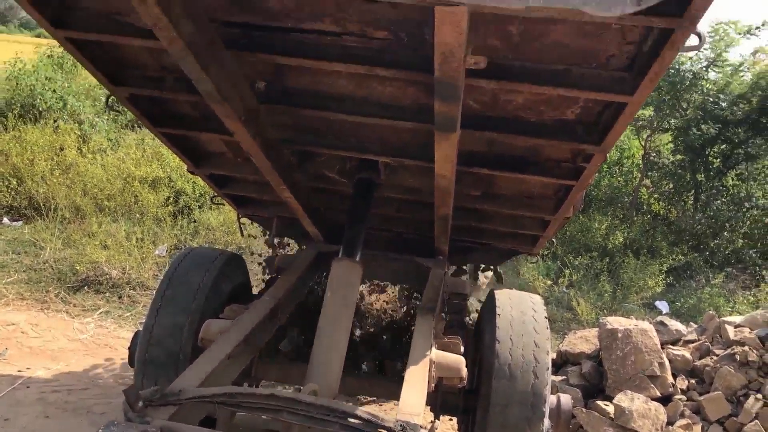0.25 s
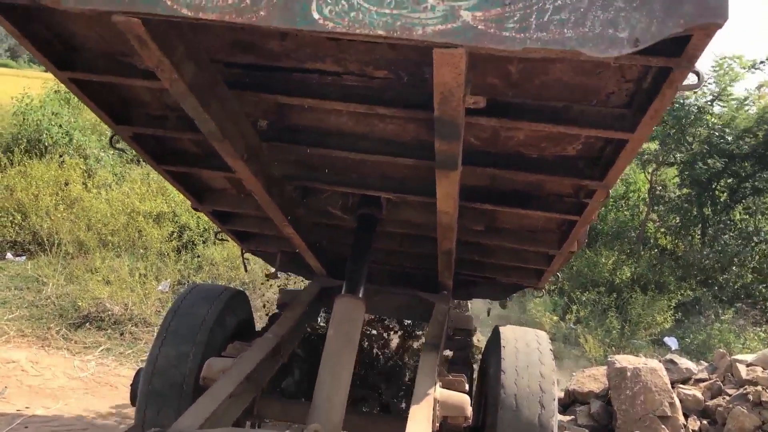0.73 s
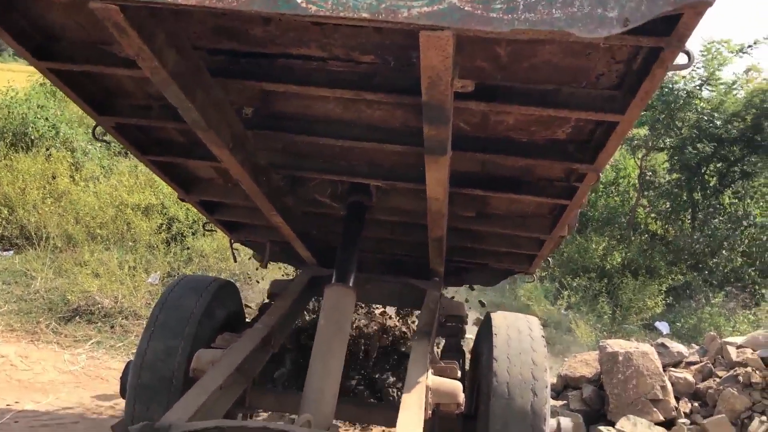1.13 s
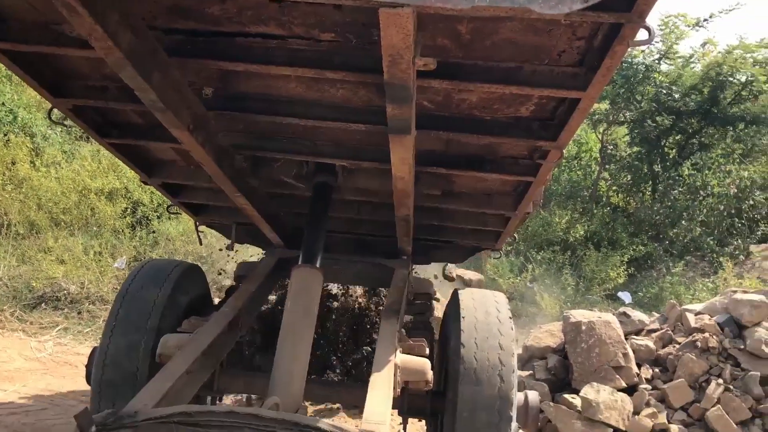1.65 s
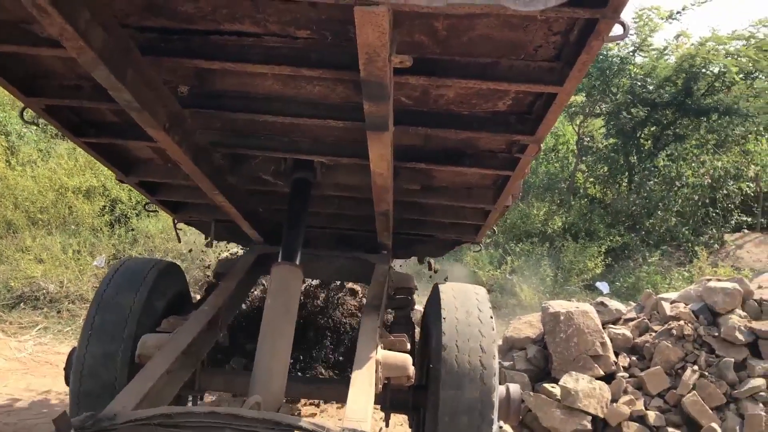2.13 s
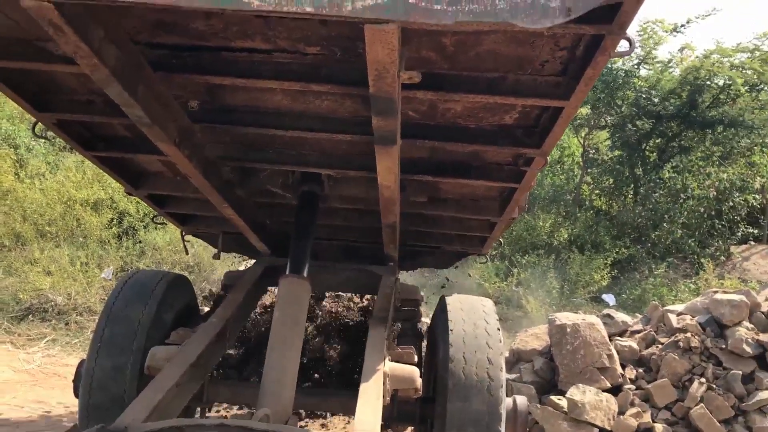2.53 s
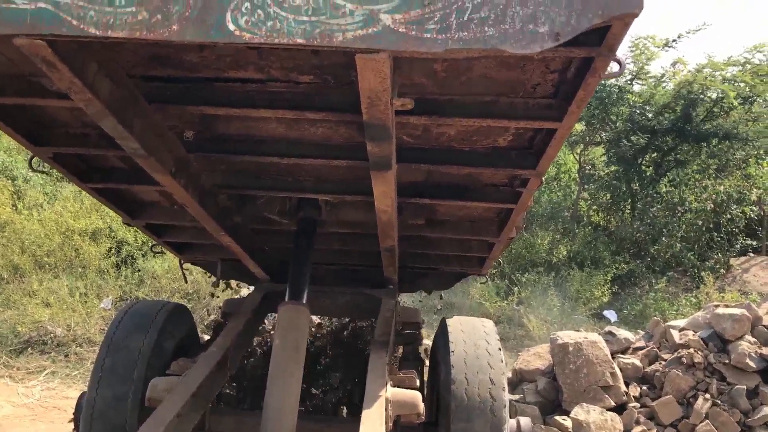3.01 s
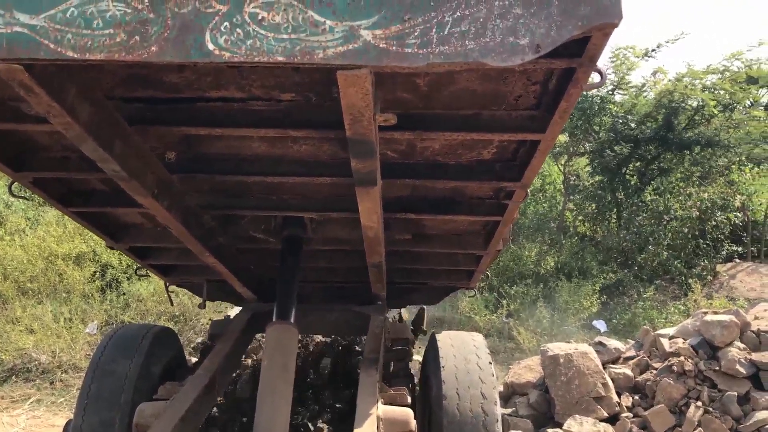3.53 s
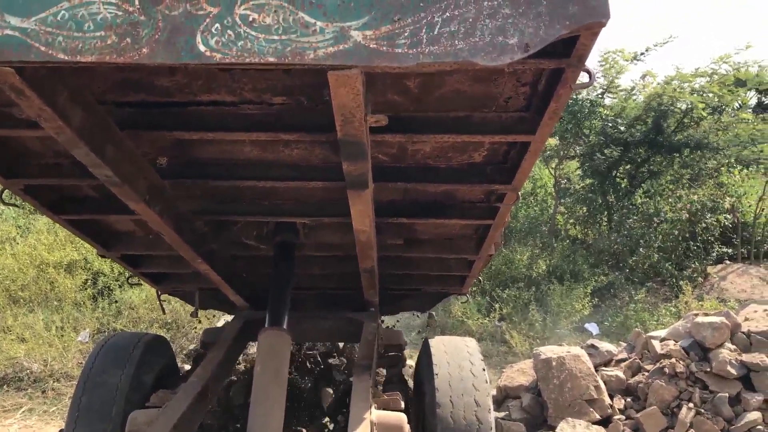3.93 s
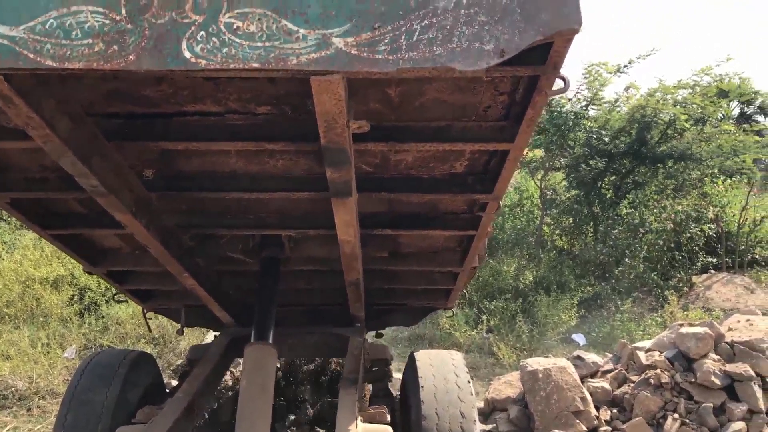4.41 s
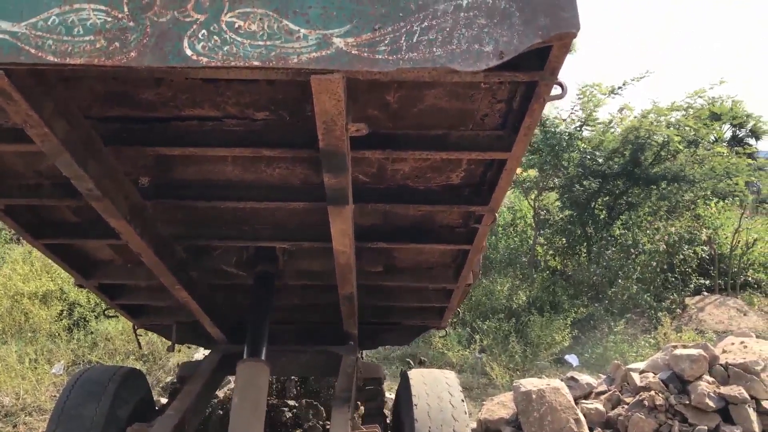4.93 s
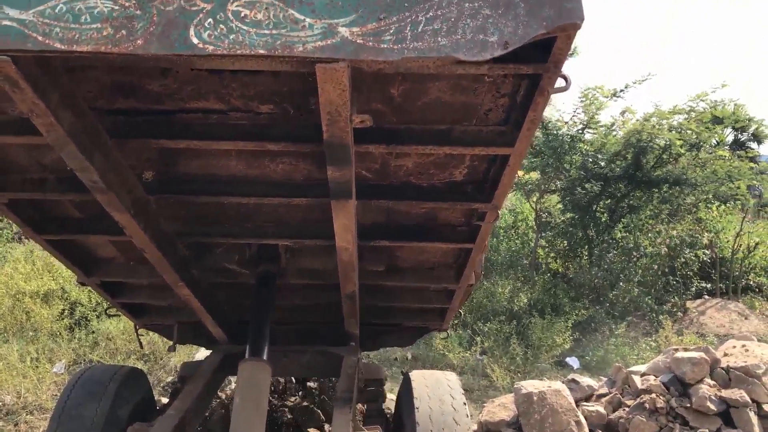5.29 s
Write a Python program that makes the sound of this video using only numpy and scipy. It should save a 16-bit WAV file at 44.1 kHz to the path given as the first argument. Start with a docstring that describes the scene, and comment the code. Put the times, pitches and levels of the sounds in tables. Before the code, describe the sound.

A close outdoor microphone faces a raised steel trailer bed. A quick rush of grit and scraping lumps opens, over a rapid steady engine drone. The load keeps hissing downward in uneven clumps, with stony cracks, metallic clanks and dull clods landing. Late on, the grit fades to a trickle, leaving a stronger throbbing exhaust, a ringing hydraulic whine, a few last knocks and two thin pings.

```python
"""A tractor chugs at a nearly steady speed in an open field as its hydraulic ram tips a steel trailer.
Dry soil and stones rush down the bed first, then pour on as filtered grit, with slabs breaking loose.
Noise bursts make hard knocks and scrapes on the steel; sinking tones make clods and a bump thud.
As the slide dies away, the exhaust's beat harmonics boom louder, the pump's ringing whine stands out
and two thin pings come from the oil lines."""
import sys
import numpy as np
from scipy import signal
from scipy.fft import rfft, irfft
from scipy.io import wavfile
from scipy.ndimage import map_coordinates

SR = 44100
rng = np.random.default_rng(int(sys.argv[2]) if len(sys.argv) > 2 else 0)


def file_out(sig):
    """Save sig as 16-bit WAV at sys.argv[1]."""
    # one column per channel
    cols = np.atleast_2d(sig).T
    # limit, then scale
    lim = np.clip(cols, -1, 1)
    pcm = np.round(lim * 32767).astype(np.int16)
    wavfile.write(sys.argv[1], SR, pcm)


N = 245195
TIME = np.arange(N) / SR

# Levels called "untrimmed" are shifted by a trim in the function that plays them.
# Background tone: [freq_hz, level_db relative]
FLOOR_SPECTRUM = [(20, -3), (45, 5.5), (150, -3.5), (350, -2), (500, -12), (1000, -13), (2000, -16),
                  (3100, -41), (6000, -19), (10000, -24), (16000, -86)]

# Engine speed; it sags when the ram takes load and races briefly when relieved: [time_s, beats_per_s]
ENGINE_SPEED = [(0, 30.18), (0.35, 28.74), (0.6, 29.36), (0.88, 30.7), (1.1, 30.13), (3.65, 30.11),
                (4.05, 29.28), (4.5, 29.64), (5.56, 29.68)]
# Engine effort; high while lifting, low while the load runs out, high again at the top:
# [time_s, level_db untrimmed]
ENGINE_EFFORT = [(0.03, -31.5), (0.32, -33), (0.49, -28), (0.82, -31.5), (0.95, -40.5), (1.83, -35),
                 (2.02, -40.5), (3.85, -34), (4.14, -24.5), (5.56, -23.5)]
# Harmonics of the exhaust beat: [multiple_of_beat, level_db relative]
EXHAUST_ORDERS = [(1, -18.5), (2, -2.5), (3, -0.5), (4, -0.5), (5, -15.5), (6, -22.5), (7, -28), (8, -34.5),
                  (9, -32.5), (10, -28), (11, -67.5), (12, -32.5)]
# Tone of the engine block's clatter: [freq_hz, level_db relative]
CLATTER_SPECTRUM = [(100, -1.5), (200, -4), (400, -8.5), (800, -8.5), (2000, -14), (6000, -31)]
CYLINDERS, START_TURN = 3, -.48  # START_TURN is in exhaust beats
# The third order (the drone) follows the effort; the other orders (the thump) grow faster,
# by THUMP_GROWTH dB more per dB of effort above or below FULL_EFFORT_DB
FULL_EFFORT_DB, DRONE_DB, THUMP_DB, THUMP_GROWTH = -25.5, -1, -4, 0.33
# Unequal cylinders: depth 0-1, place of the strongest in the engine cycle 0-1
UNEVEN, STRONG_AT = 0.12, 0.91

# Pump whine; comes and goes in swells, strongest near the end: [time_s, level_db untrimmed]
PUMP_LEVEL = [(0.0, -38), (0.55, -52), (0.68, -41), (0.9, -44.5), (1.85, -39.5), (2.08, -59), (2.35, -45.5),
              (3.2, -47.5), (3.42, -39.5), (4.55, -35.5), (5.05, -37.5), (5.25, -31.5), (5.56, -36.5)]
# Ringing metal of the pump: [freq_hz, width_hz, level_db relative]
WHINE_MODES = [(1196.5, 71, -1.5), (1114, 66, -10)]
# Hissing oil lines: [freq_hz, width_hz, level_db relative]
OIL_MODES = [(3920, 62, -2), (4060, 69, -35), (5010, 92, -20), (6250, 230, -5.5), (6670, 420, -6.5)]
# Pump teeth meshing per exhaust beat; strength of their tone against the ringing (ratio)
GEAR_ORDER, GEAR_SHARE = 40.66, 1.1

# Resonances and dead bands of the steel bed: [freq_hz, width_hz, gain_db above its broad response]
BED_MODES = [(1126, 60, 9.5), (1524, 125, 6), (1820, 314, -10), (2059, 13, 4.5), (2220, 174, -6.5),
             (3655, 270, -8.5), (3976, 370, 8.5), (4710, 107, 5.5), (5216, 160, 3.5), (5880, 140, -7.5),
             (7510, 96, -10.5), (8840, 153, -6.5), (9680, 80, -17)]
# Low modes of a floor panel: [freq_hz, width_hz, level_db relative]
PANEL_MODES = [(1200, 210, -2.5), (1530, 160, 0.5)]
# Lumps scraping along the bed: [start_s, level_db, length_s, start_hz, end_hz, width_octaves]
SCRAPE_EVENTS = [(0.04, -31, 0.069, 3630, 3350, 0.67), (0.133, -21.5, 0.026, 4150, 2574, 0.93),
                 (0.142, -25, 0.055, 2587, 1176, 0.37), (0.363, -25, 0.041, 3010, 2604, 0.78),
                 (0.402, -33.5, 0.028, 2590, 2415, 1), (2.379, -23, 0.018, 4940, 4300, 0.11)]

# Clods thudding down, and one deep bump of the trailer at 61 Hz: [start_s, level_db, pitch_hz]
THUD_EVENTS = [(0.094, -27.5, 584), (0.16, -25.5, 590), (0.172, -32, 186), (0.293, -28.5, 670),
               (0.322, -30.5, 803), (0.367, -27.5, 386), (0.374, -28.5, 773), (0.679, -18.5, 368),
               (0.699, -25.5, 728), (0.713, -21, 61.3), (1.313, -30.5, 388), (1.326, -28, 214),
               (1.400, -20, 262.3), (1.935, -32.5, 594), (2.786, -29, 794)]
# A thud at THUD_HZ has the time scale THUD_S; lower ones last longer by this power of the pitch ratio
THUD_HZ, THUD_S, THUD_LENGTHENS = 405, 0.037, .27

# Hard knocks on the bed, with two late thin pings near 3.9 kHz from the oil lines:
# [start_s, knock_db untrimmed, pitch_hz, clank_db untrimmed]
KNOCK_EVENTS = [(0.2127, -20, 3210, -32.5), (0.331, -22.5, 1490, -43), (0.405, -22, 2600, -28),
                (0.5538, -30, 1530, -42), (0.773, -17.5, 5900, -52), (0.9632, -18, 3670, -28.5),
                (1.0949, -15, 2870, -33), (1.2068, -18, 1490, -26), (1.989, -13.5, 4500, -50),
                (2.057, -13, 5130, -60), (2.455, -18, 2750, -50), (2.4864, -16.5, 2970, -41),
                (2.754, -20.5, 1470, -35), (2.8453, -19.5, 2480, -30), (2.8743, -15.5, 2550, -27),
                (2.9559, -21, 2330, -28.5), (3.0966, -16.5, 1530, -28), (3.421, -13.5, 3500, -23.5),
                (3.5058, -20.5, 3890, -31), (4.095, -18, 3780, -32), (4.1436, -18, 1280, -27),
                (4.2642, -16, 2070, -50), (4.404, -20.5, 2730, -45), (5.1157, -20, 3920, -45),
                (5.1982, -23.5, 3840, -40), (5.3003, -17, 1240, -33)]
# Chatter takes CHATTER_T60_S to fall 60 dB at a clank of BARE_DB (untrimmed); on barer steel a stone
# bounces clear sooner: half as long per BOUNCE_DB more clank, at most doubled for less
CHATTER_T60_S, BARE_DB, BOUNCE_DB = 0.053, -30.5, 21
# Random small stones: count, dB against the pour (both untrimmed) and its spread, pitch and its spread
PEBBLE_COUNT, PEBBLE_DB, PEBBLE_SPREAD_DB, PEBBLE_HZ, PEBBLE_OCTAVES = 24, 6, 1, 3500, .3

# Soil sliding on steel; a first rush, a long steady pour, a trickle: [time_s, level_db untrimmed]
POUR_LEVEL = [(0.0, -26.5), (0.14, -25), (0.22, -34), (0.52, -33.5), (0.85, -29), (1.4, -27), (1.87, -27.5),
              (2.25, -31), (2.6, -30.5), (2.82, -33.5), (3.0, -29), (3.25, -33.5), (4.0, -28.5),
              (4.44, -31.5), (4.62, -43), (5.2, -41), (5.56, -43)]
# Tone of the sliding soil before the bed colours it: [freq_hz, level_db relative]
SLIDE_SPECTRUM = [(700, -13), (1300, -11.5), (2000, -7.5), (2500, 0.5), (3200, 1.5), (4400, -6.5),
                  (6600, -3.5), (8500, -8), (11000, -11), (16000, -13.5)]
# Tone of the landing soil before the bed colours it: [freq_hz, level_db relative]
LANDING_SPECTRUM = [(100, 5), (150, -14), (195, 4.5), (300, 0), (390, 2), (480, -12), (600, 2), (700, -4.5),
                    (800, 1), (950, -8), (1550, -11.5), (3000, -33)]
# Slabs of soil breaking loose: [peak_s, half_length_s, slide_db untrimmed, landing_db untrimmed]
SLAB_EVENTS = [(0.073, 0.032, -24.5, -40), (0.2, 0.058, -34.5, -36.5), (0.392, 0.051, -26, -38),
               (0.686, 0.031, -31.5, -42), (1.23, 0.12, -49, -46.5), (1.77, 0.095, -28, -41.5),
               (1.953, 0.021, -22.5, -42), (3.35, 0.051, -31.5, -42)]
# Between slabs the landing follows the pour: HEAP_DB at a pour of POUR_DB (both untrimmed), dB per dB
POUR_DB, HEAP_DB, HEAP_FOLLOWS = -31.5, -52, .3
# The pour swells and slackens by chance: rms dB, rough upper rate
POUR_SWELL_DB, POUR_SWELLS_PER_S = 0.96, 5.2

# Sideways scatter against the direct sound: [freq_hz, level_db]
SCATTER_SPECTRUM = [(60, -25), (300, -19), (1200, -19), (3000, -23), (8000, -23), (13000, -11)]
# Left-right level balance by frequency: [freq_hz, left_minus_right_db]
STEREO_BALANCE = [(35, -9), (60, -7), (89, -1.8), (120, 1.6), (160, 2.8), (270, 2.5), (360, 4.5), (630, -2),
                  (1000, 0), (1130, 5), (1230, 0.5), (1450, 0), (1600, -3), (1750, 0)]
EDGE_HZ = 15850  # upper band limit


def amp(db):
    """Turns decibels into an amplitude factor."""
    return 10 ** (np.asarray(db) / 20)


def unit(x):
    """Scales to rms 1."""
    return x / np.sqrt(np.mean(x ** 2) + 1e-20)


def curves(rows):
    """Draws each column of a table as a control line over time."""
    s, *columns = np.transpose(rows)
    return [np.interp(TIME, s, c) for c in columns]


def bins(x):
    """Frequencies of the spectrum in Hz, kept just above zero."""
    return np.fft.rfftfreq(len(x), 1 / SR) + 1e-3


def colour(x, points):
    """Filters by a spectrum of frequency and level points."""
    hz, db = np.transpose(points)
    gain = amp(np.interp(np.log(bins(x)), np.log(hz), db))
    return irfft(rfft(x) * gain, len(x))


def ring(x, modes, order=1):
    """Sums causal resonances; order 2 has steeper skirts."""
    f = bins(x)
    response = sum(amp(db) / (1 + 2j * (f - hz) / width) ** order for hz, width, db in modes)
    return irfft(rfft(x) * response, len(x))


def causal(db):
    """The response of a passive body with this gain per bin: it rings after a blow, never before."""
    cepstrum = irfft(np.log(amp(db)))
    half = len(cepstrum) // 2
    cepstrum[1:half] *= 2
    cepstrum[half + 1:] = 0
    return np.exp(rfft(cepstrum))


def wander(rate):
    """Slow chance of rms 1, up to about the given rate in Hz."""
    t = TIME[::49]
    f = np.fft.rfftfreq(len(t), t[1])
    noise = rfft(rng.standard_normal(len(t)))
    slow = irfft(noise / (1 + (f / rate) ** 4), len(t))
    return unit(np.interp(TIME, t, slow))


def grains(per_s, spread_db):
    """Random impacts: many small, a few large."""
    size = amp(spread_db * np.minimum(rng.exponential(1, N), 5))
    struck = rng.random(N) < per_s / SR
    return unit(size * rng.choice([-1, 1], N) * struck)


def rasping(size, hz, octaves):
    """Contact noise spread around one frequency."""
    noise = rng.standard_normal(size)
    distance = np.log2(bins(noise) / hz) / octaves
    return unit(irfft(rfft(noise) * np.exp(-.5 * distance ** 2), size))


def add(mix, s, sound):
    """Lays a sound into the mix at a time in seconds."""
    part = mix[max(round(s * SR), 0):][:len(sound)]
    part += sound[:len(part)]


def background(floor_db=-46):
    """Steady noise with a broad, low-heavy tone."""
    return amp(floor_db) * unit(colour(rng.standard_normal(N), FLOOR_SPECTRUM))


def pump(turns, lag=.26, whine_db=-1, swell_db=1.44, oil_db=-48, oil_flutter_db=3):
    """Gears sing and rushing oil keeps the metal ringing, pushed once a beat; the lines hiss fitfully."""
    kicks = np.diff(np.floor(turns - lag), prepend=-1)
    push = np.cos(2 * np.pi * (turns - lag))
    rush = (1 + .5 * push) * rng.standard_normal(N)
    mesh = np.sin(2 * np.pi * GEAR_ORDER * turns + .5 * wander(7.5))
    teeth = unit((1 + push) * mesh)
    ringing = unit(ring(unit(kicks) + 1.7 * unit(rush), WHINE_MODES, order=2))
    whine = unit(ringing + GEAR_SHARE * teeth)
    oil = np.zeros(N)
    for line in OIL_MODES:  # each line flutters on its own
        hiss = rng.standard_normal(N) * amp(oil_flutter_db * wander(25))
        oil += ring(hiss, [line], order=2)
    whine_level = amp(curves(PUMP_LEVEL)[0] + whine_db + swell_db * wander(8.3))
    return whine_level * whine + amp(oil_db) * unit(oil)


def valve(turns, place=.47, level_db=-25):
    """A loose valve taps and rings once per engine cycle, harder with effort."""
    taps = np.diff(np.floor(turns / CYLINDERS - place), prepend=-1)
    taps = taps * (1 + 0.32 * rng.standard_normal(N))
    tap_mode = [(1078, 48, 0)]  # freq_hz, width_hz, level_db
    return amp(curves(ENGINE_EFFORT)[0] + level_db) * unit(ring(taps, tap_mode, order=2))


def exhaust(turns, flutter_db=1.0, clatter_db=-17, knock=0.21):
    """Each beat is a short damped boom from the pipe, with a little clatter from the block."""
    effort_db = curves(ENGINE_EFFORT)[0]
    drone_db = effort_db + DRONE_DB
    thump_db = effort_db + THUMP_DB + THUMP_GROWTH * (effort_db - FULL_EFFORT_DB)
    cylinders = 1 + UNEVEN * np.cos(2 * np.pi * (turns / CYLINDERS - STRONG_AT))
    db = np.transpose(EXHAUST_ORDERS)[1]
    pipe = causal(np.r_[2 * db[0], db])[1:]  # gain and phase per order
    tones = np.zeros(N)
    for k, response in enumerate(pipe, 1):
        level = amp(drone_db if k == 3 else thump_db)
        tones += level * (response * np.exp(2j * np.pi * k * turns)).real
    beating = 1 + knock * np.sin(2 * np.pi * turns)
    clatter = unit(colour(rng.standard_normal(N) * beating, CLATTER_SPECTRUM))
    boom = np.sqrt(2) * tones * cylinders * amp(flutter_db * wander(60))
    return boom + amp(drone_db + clatter_db) * clatter


def steel(x):
    """Colours a contact sound by the bed's resonances."""
    f = np.fft.rfftfreq(4096, 1 / SR)
    gain_db = sum(db * np.exp(-2 * ((f - hz) / width) ** 2) for hz, width, db in BED_MODES)
    return signal.fftconvolve(x, irfft(causal(gain_db)))[:len(x)]


def scrapes():
    """A lump grinds along the bed, its rasp falling as it slows."""
    out = np.zeros(N)
    for s, db, length, start_hz, end_hz, octaves in SCRAPE_EVENTS:
        hz = np.geomspace(start_hz, end_hz, int(length * SR))
        rasp = rasping(SR // 2, end_hz, octaves)
        # reading the rasp ever more slowly makes it glide down
        glide = map_coordinates(rasp, [np.cumsum(hz) / end_hz], mode="wrap")
        add(out, s, amp(db) * unit(glide) * signal.windows.tukey(len(hz), .5))
    return out


def thuds(sag=0.12, crumble=0.36):
    """A clod, or once the bumping trailer, gives a short hollow thud that sinks in pitch."""
    out = np.zeros(N)
    for s, db, hz in THUD_EVENTS:
        scale_s = THUD_S * (THUD_HZ / hz) ** THUD_LENGTHENS
        u = np.arange(0, 2, 1 / (scale_s * SR))
        sinking_hz = hz * (1 + sag * (.5 - u))
        tone = np.sin(2 * np.pi * np.cumsum(sinking_hz) / SR)
        push = u ** 2 * np.exp(-6 * u)
        thud = tone + crumble * rasping(len(u), hz, 0.63)
        add(out, s, amp(db) * push / push.max() * thud)
    return out


def pebbles(clank_db=-23):
    """Small stones tumble at random moments, about as loud as the pour allows; rows like KNOCK_EVENTS."""
    s = TIME[-1] * rng.random(PEBBLE_COUNT)
    size, pitch = rng.standard_normal((PEBBLE_COUNT, 2)).T
    db = np.interp(s, *np.transpose(POUR_LEVEL)) + PEBBLE_DB + PEBBLE_SPREAD_DB * size
    hz = PEBBLE_HZ * 2 ** (PEBBLE_OCTAVES * pitch)
    return list(zip(s, db, hz, db + clank_db))


def knocks_and_pings(level_db=-10, rise_s=0.0015, note_db=6, note_width_hz=100, crack=0.84, crack_hz=3000,
                     crack_s=0.0043, octaves=0.56, clank_db=-5):
    """Each hit cracks, chatters and clanks by its own amount; the oil lines' pings are made the same way."""
    out, t = np.zeros(N), np.arange(SR // 6) / SR
    onset = SR // 100  # levels are set over the first 10 ms
    for s, db, hz, panel_db in [*KNOCK_EVENTS, *pebbles()]:
        t60 = CHATTER_T60_S * 2 ** min((BARE_DB - panel_db) / BOUNCE_DB, 1)
        fade = amp(-60 * t / t60)
        chatter = rasping(len(t), hz, octaves) * fade
        snap = crack * rasping(len(t), crack_hz, octaves) * np.exp(-t / crack_s)
        note = ring(chatter, [(hz, note_width_hz, note_db)])
        knock = steel((snap + chatter + note) * (1 - np.exp(-t / rise_s)))
        blow = rng.standard_normal(len(t)) * fade * (1 - np.exp(-t / 0.0012))
        clank = ring(blow, PANEL_MODES, order=2)
        add(out, s, amp(db + level_db) * knock / np.std(knock[:onset]))
        add(out, s, amp(panel_db + clank_db) * clank / np.std(clank[:onset]))
    return out


def slabs():
    """Loose slabs swell and pass: their amplitude over time on the steel, and on the heap."""
    total = np.zeros((2, N))
    for s, half, slide_db, land_db in SLAB_EVENTS:
        swell = np.exp(-((TIME - s) / half) ** 2)
        total += swell * amp([[slide_db], [land_db]])
    return total


def landing(landing_db=6.0, lumpy_db=0.5):
    """Crumbs patter over the tail of the bed onto the heap."""
    patter = (grains(900, 2.95) + 0.62 * rng.standard_normal(N)) * amp(lumpy_db * wander(30))
    steady = amp(HEAP_DB + HEAP_FOLLOWS * (curves(POUR_LEVEL)[0] - POUR_DB))
    level = amp(landing_db) * np.hypot(steady, slabs()[1])
    return level * unit(steel(colour(patter, LANDING_SPECTRUM)))


def slide(slide_db=-0.8, dust=0.93, bursts_per_s=110, burst_s=0.0083, clump_db=2.5, count=26):
    """Grit skids down the steel in clumps that burst apart; each size of grit hisses in its own band."""
    f, rush = bins(TIME), np.zeros(N)
    place = np.interp(np.sqrt(f), np.sqrt([1200, 15000]), [0, count - 1])  # band number per frequency
    grit = rfft(grains(2500, 2.5) + dust * rng.standard_normal(N))
    for k in range(count):
        band = np.cos(np.pi / 2 * np.clip(place - k, -1, 1)) ** 2
        rush += irfft(grit * band, N) * amp(clump_db * wander(43))
    breaks = rng.random(N) * (rng.random(N) < bursts_per_s / SR)
    surge = 1 + signal.lfilter([1], [1, -np.exp(-1 / (burst_s * SR))], breaks)
    pour = amp(curves(POUR_LEVEL)[0] + POUR_SWELL_DB * wander(POUR_SWELLS_PER_S))
    level = amp(slide_db) * np.hypot(pour, slabs()[0])
    return level * unit(steel(colour(rush * surge, SLIDE_SPECTRUM)))


def underside(x, echo=0.37, decay_s=0.0084, count=40):
    """Beams and wheels throw back a cluster of early reflections."""
    delay = rng.uniform(.001, .03, count)
    size = rng.choice([-1, 1], count) * np.exp(-delay / decay_s)
    taps = np.bincount((delay * SR).astype(int), size / np.linalg.norm(size))
    return (x + echo * signal.fftconvolve(x, taps)[:N]) / np.hypot(1, echo)


def scatter(mid):
    """The trailer throws a little sound sideways as a dense, fast-fading cluster of echoes."""
    t = np.arange(SR // 20) / SR
    echoes = rng.standard_normal(len(t)) * np.exp(-t / 0.008)
    return colour(signal.fftconvolve(mid, echoes / np.linalg.norm(echoes))[:N], SCATTER_SPECTRUM)


def scene():
    """All sources lie ahead of the microphone; the scatter goes to left and right in opposite sign."""
    turns = START_TURN + np.cumsum(curves(ENGINE_SPEED)[0]) / SR  # exhaust beats so far
    tractor = pump(turns) + valve(turns) + exhaust(turns)
    load = scrapes() + thuds() + knocks_and_pings() + underside(landing() + slide())
    mid = background() + tractor + load
    side = scatter(mid)
    return np.array([mid + side, mid - side])


def record(dry):
    """Left and right differ in colour; the sharpest peaks are rounded; then the band limit."""
    channels = []
    for x, sign in zip(dry, (1, -1)):
        channels.append(colour(x, [(hz, sign * db / 2) for hz, db in STEREO_BALANCE]))
    channels = np.array(channels)
    rounded = channels / (1 + (channels / .38) ** 4) ** .25
    lowpass = signal.firwin(511, EDGE_HZ, window=("kaiser", 9), fs=SR)
    return signal.oaconvolve(rounded, lowpass[None], "same")


dry = scene()
out = record(dry)
file_out(out)
```